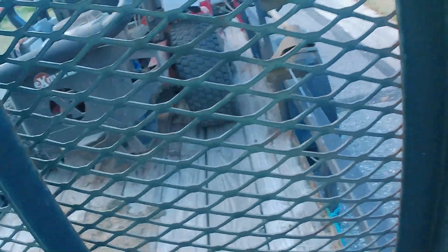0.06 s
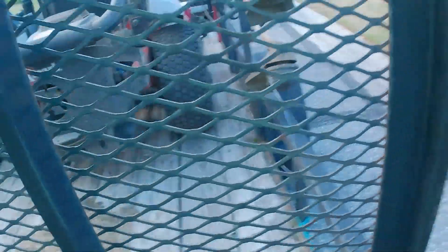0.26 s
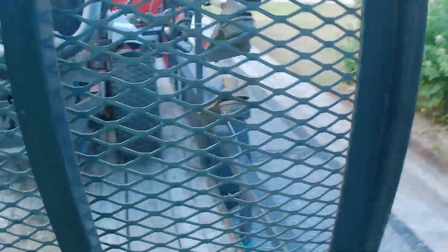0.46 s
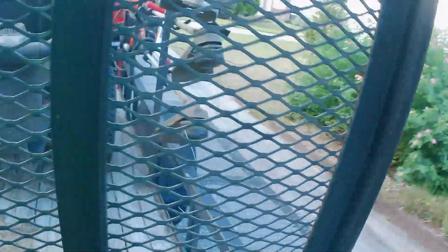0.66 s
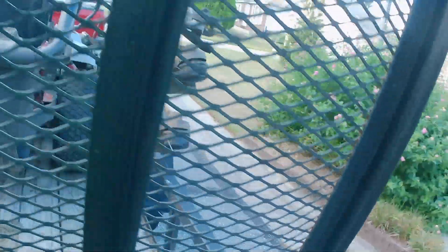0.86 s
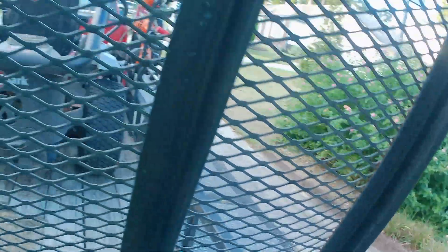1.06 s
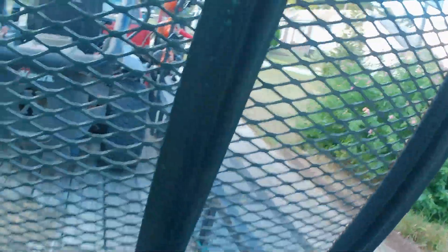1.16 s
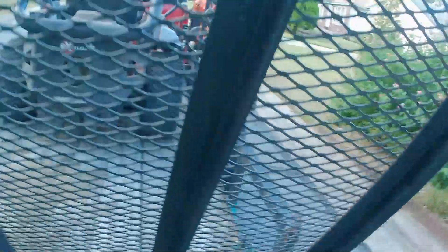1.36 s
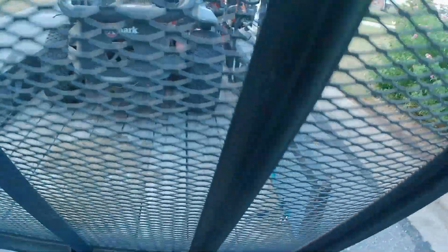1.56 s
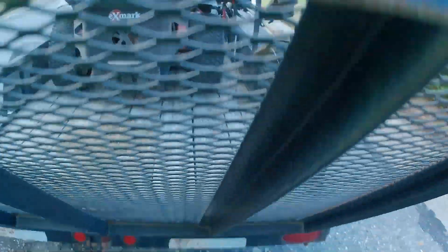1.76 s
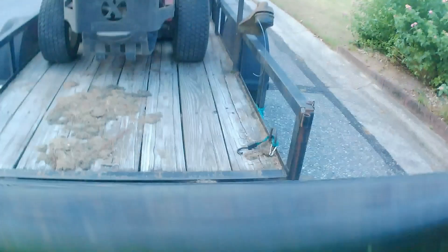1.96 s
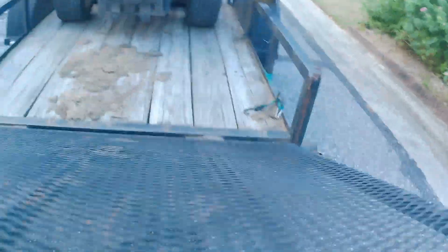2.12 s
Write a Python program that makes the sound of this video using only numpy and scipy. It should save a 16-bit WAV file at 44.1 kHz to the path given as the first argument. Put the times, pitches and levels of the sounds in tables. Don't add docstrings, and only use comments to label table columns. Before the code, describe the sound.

Metal trailer gate unlatching: small squeaks, one loud clang, weaker irregular clanks with sizzling mesh rattle

```python
import sys
import numpy as np
from scipy import signal
from scipy.fft import rfft, irfft
from scipy.io import wavfile
from scipy.ndimage import uniform_filter1d

SR = 44100
rng = np.random.default_rng(int(sys.argv[2]) if len(sys.argv) > 2 else 0)


def wav_out(sig):
    wavfile.write(sys.argv[1], SR, np.round(np.clip(np.atleast_2d(sig).T, -1, 1) * 32767).astype(np.int16))


def makeup_ratio(level_db):
    decades = np.asarray(level_db, float) / 20
    return 10 ** decades


N = 97020


def rms_one(x):
    return x / np.sqrt(np.mean(x ** 2) + 1e-20)


def at_hz(points, hz):
    table_hz, value = np.transpose(points)
    return np.interp(np.log(hz), np.log(table_hz), value)


def drift(rate_hz):
    r = np.exp(-2 * np.pi * rate_hz / SR)
    noise = rng.standard_normal(N + SR)
    return rms_one(signal.lfilter([1], [1, -2 * r, r * r], noise)[SR:])


def ring(clicks, hz, t60):
    r, w = makeup_ratio(-60 / (t60 * SR)), 2 * np.pi * hz / SR
    return signal.lfilter([0, np.sin(w)], [1, -2 * r * np.cos(w), r * r], clicks + 1e-18)


def colour(x, spectrum):
    hz = np.arange(N // 2 + 1) * SR / N + 1
    return rms_one(irfft(rfft(x) * makeup_ratio(at_hz(spectrum, hz)), N))


def band(x, low_hz, high_hz, order=2):
    return signal.sosfilt(signal.butter(order, [low_hz, high_hz], "band", fs=SR, output="sos"), x)


BASS_HZ, MID_HZ, TREBLE_HZ = 267, 910, 3890


def strike_db(strikes, hz):
    s, db, bass_db, treble_db = np.transpose(strikes)
    toward = np.log(hz / MID_HZ) / np.log([BASS_HZ / MID_HZ, TREBLE_HZ / MID_HZ])
    low, high = np.clip(toward, 0, 1.5)
    return db + low * bass_db + high * treble_db


# (time [s], peak level [dB], extra bass [dB], extra treble [dB])
BLOWS = [(0.256, 0, -2, -14), (0.347, -9.5, -1, 2.5), (0.514, -12.5, 1.2, 4), (0.598, -22, 6.5, 8.5),
         (0.771, -7.5, -2, 7), (.782, -16, 2.5, -24), (0.951, -12.5, -5, 3.5), (1.08, -19.5, -19, -8.5),
         (1.332, -15, -0.5, -25), (1.37, -25.5, 7.5, -1.5), (1.447, -21, 1.7, -7.5), (1.525, -28, 6, -11),
         (1.568, -25.5, 2.1, -10), (1.617, -29, 4, -5.5), (1.752, -21, 4, -6), (1.764, -22, -7.5, 4),
         (1.907, -48, 7, 10), (1.978, -29, 2.5, -25)]
# (time [s], level [dB], extra bass [dB], extra treble [dB])
SHOVES = [(0.049, -38, -11, -10), (0.084, -28.5, -8, 0), (0.109, -26.5, 1, -7), (.16, -20, 0.5, -11),
          (.19, -14.5, 8, 0), (0.219, -18, -18, -2), (.372, -9.5, -4.5, -17), (.42, -18, 5, -4),
          (0.599, -23.5, -6, 7), (0.711, -27, 10.5, -7), (1.04, -36, 19.5, 9), (1.105, -29.5, 1, -4.5),
          (1.179, -32.5, 7, -28), (1.265, -36.5, 7, -12), (1.403, -45.5, 4.5, 8.5), (1.79, -29.5, -7, -2),
          (1.99, -39, 7.5, -10), (2.02, -50.5, -0.5, -14)]
# (frequency [Hz], density [dB per Hz])
FRAME = [(120, -16), (300, -7), (600, -4), (790, -8.5), (1220, -3), (1650, -7), (2300, -8.5), (6000, -29)]
# (frequency [Hz], t60 [s])
FRAME_T60 = [(150, 0.69), (400, 0.28), (1040, 0.16), (2760, 0.12), (6000, 0.052)]
# (frequency [Hz], level [dB], t60 [s])
TUBES = [(642, -18.5, 0.055), (1144, -26.5, 0.19), (2930, -23.5, 0.07), (1970, -29.5, 0.32),
         (454, -24.5, 0.31)]
CONTACT_S, SHOVE_S = .005, .03
FRAME_DB, MODE_SPREAD_DB, T60_SPREAD_DB = -27, 4, 2
FRAME_CUT_HZ = 147


def frame(count=420):
    strikes = BLOWS + SHOVES
    s = np.array(strikes)[:, 0]
    contact_s = np.repeat([CONTACT_S, SHOVE_S], [len(BLOWS), len(SHOVES)])
    hz = np.geomspace(130, 6500, count) * np.exp(rng.normal(0, .004, count))
    t60 = at_hz(FRAME_T60, hz) * makeup_ratio(T60_SPREAD_DB * rng.uniform(-0.067, 1, count))
    uneven_db = MODE_SPREAD_DB * np.minimum(rng.standard_normal(count), 2)
    mode_db = FRAME_DB + uneven_db + at_hz(FRAME, hz) + 10 * np.log10(hz / 1000)
    modes = list(zip(hz, mode_db, t60)) + TUBES
    strength = rng.standard_normal((len(s), len(modes)))
    late = rng.random((len(s), len(modes)))
    out, clicks = np.zeros(N), np.zeros(N)
    for k, (f, level_db, ring_s) in enumerate(modes):
        at = ((s + contact_s * late[:, k] ** 1.5) * SR).astype(int)
        push = (.5 + .5 * np.abs(strength[:, k])) * np.sign(strength[:, k])
        clicks[at] = push * makeup_ratio(level_db + strike_db(strikes, f))
        out += ring(clicks, f, ring_s)
        clicks[at] = 0
    return band(out, FRAME_CUT_HZ, 11000)


def latch_knock():
    click = np.zeros(N)
    click[int(.2599 * SR)] = makeup_ratio(-2)
    return band(ring(click, 850, .006), FRAME_CUT_HZ, 11000)


# (frequency [Hz], t60 [s])
TAIL_T60 = [(150, 0.21), (400, 1), (1040, 0.7), (2760, 0.62), (6000, 0.23)]
TAIL_DB = -11.5


def frame_tail():
    strikes = BLOWS + SHOVES
    at = (np.array(strikes)[:, 0] * SR).astype(int)
    edges = 130 * 2 ** np.arange(0, 6.1, .5)
    out = np.zeros(N)
    white = rng.standard_normal((2, N))
    for k, (low, high) in enumerate(zip(edges, edges[1:])):
        hz, power = np.sqrt(low * high), np.zeros(N)
        power[at] = makeup_ratio(2 * strike_db(strikes, hz))
        power = signal.lfilter([1], [1, -makeup_ratio(-120 / (at_hz(TAIL_T60, hz) * SR))], power)
        power = uniform_filter1d(power, size=221, origin=110)
        out += np.sqrt(np.abs(power)) * makeup_ratio(at_hz(FRAME, hz)) * band(white[k % 2], low, high)
    return makeup_ratio(TAIL_DB) * out


# (time [s], frequency [Hz], level [dB], t60 [s])
CLANGS = [(.257, 2092, -21, 0.34), (.258, 4110, -19.5, 0.079), (.257, 548.6, -13.5, 0.078),
          (.257, 985, -17.5, 0.18), (0.261, 192.8, -27, 0.2), (0.261, 322, -21, .12),
          (.258, 650, -29, 0.51), (0.257, 1238, -14.5, 0.088), (0.257, 1064, -18, 0.19),
          (.258, 4320, -29, 0.15), (.258, 3430, -27, .11), (0.349, 582, -24, 0.22),
          (0.348, 1172, -25.5, 0.22), (.349, 2330, -29, 0.19), (0.362, 2950, -33, 0.16),
          (0.351, 4450, -27.5, 0.063), (0.346, 3690, -26.5, 0.046), (.415, 463, -31, 0.29),
          (0.43, 201, -28, 0.19), (0.512, 1712, -26, 0.087), (.6, 1887, -30, 0.15),
          (0.773, 1146, -24, 0.27), (.772, 605, -19, 0.041), (0.772, 1460, -19, 0.053),
          (.78, 329, -35, 0.28), (.79, 2062, -53, .5), (0.953, 1322, -22.5, 0.059),
          (0.953, 1043, -29.5, 0.2), (0.955, 1472, -33.5, 0.091), (.96, 2100, -36, 0.3),
          (.953, 2934, -30, 0.063), (1.05, 207.5, -36, 0.27), (1.251, 3000, -51, .03),
          (1.267, 3560, -51, .03), (.2, 290, -27, 0.24), (1.334, 1038, -38.5, 0.24),
          (1.336, 1270, -35.5, 0.13), (1.333, 3140, -47, 0.053), (1.374, 3170, -48, 0.035),
          (1.424, 2470, -59.5, .03), (1.448, 3200, -44.5, 0.045), (1.448, 1267, -35.5, 0.051),
          (1.766, 2077, -38, 0.21), (1.768, 1380, -38, 0.15), (1.768, 1760, -42.5, 0.15),
          (1.764, 4130, -46.5, 0.15), (1.907, 3840, -59, 0.046), (1.9795, 636, -39, 0.097),
          (1.98, 2770, -57, .07), (1.981, 3520, -61, .06)]
TWIN_RATIO, TWIN_SHARE = 1.012, .4


def clangs():
    out = np.zeros(N + SR)
    click = np.zeros(SR // 2)
    for s, hz, db, t60 in CLANGS:
        click[0] = makeup_ratio(db)
        start = int(s * SR)
        pair = ring(click, hz, t60) + TWIN_SHARE * ring(click, hz * TWIN_RATIO, t60)
        out[start:start + SR // 2] += pair
    return band(out[:N], FRAME_CUT_HZ, 15400)


# (time [s], level [dB], rise [s], t60 [s])
JOLTS = [(0.075, -48, 0.0033, .15), (0.088, -39, 0.0069, .2), (.1, -30, 0.0089, 0.24),
         (0.158, -22, 0.0034, 0.25), (0.194, -19, 0.015, 0.15), (0.2547, -11, 0.004, 0.24),
         (0.344, -21, 0.0074, 0.54), (0.368, -15, 0.022, 0.12), (.513, -31.5, 0.011, 0.22),
         (0.593, -25.5, 0.0059, 0.16), (0.698, -29.5, 0.0076, 0.094), (0.7713, -19, 0.0029, 0.2),
         (.925, -33.5, 0.023, 0.13), (.95, -32, 0.0028, 0.35), (1.045, -42, 0.0049, 0.17),
         (1.065, -42, 0.0084, 0.18), (1.167, -36.5, 0.0044, 0.072), (1.238, -40.5, 0.0037, 0.095),
         (1.25, -50, 0.0036, .06), (1.266, -51, 0.0036, 0.1), (1.333, -39, 0.0035, 0.12),
         (1.372, -53, 0.0053, 0.11), (1.447, -47, 0.0043, 0.16), (1.519, -54, 0.0046, 0.092),
         (1.619, -57, 0.0043, 0.063), (1.753, -51, 0.0056, .13), (1.764, -36.5, 0.01, 0.11),
         (1.907, -59.5, 0.0046, 0.078), (1.979, -71, .004, .08)]
# (frequency [Hz], density [dB per Hz])
MESH = [(1060, -19.5), (1800, -6), (3740, -3.5), (4060, -3.5), (4660, -4.5), (5640, -6.5), (7910, -2.5),
        (10900, -4.5), (16000, -25.5)]
TICKS_PER_S, TICK_SPREAD_DB, TICK_CYCLES = 16000, -2, 11.5
MESH_DB, MESH_TAIL_DB, MESH_TAIL_T60_S = -11, -19.5, 0.37
PATCH_DB, PATCH_PER_S = 1.5, 10.4
DULLING_DB_PER_S = 3
PIN_RING_DB, PIN_RING_T60_S = -38.5, 0.042


def mesh(count=24):
    t, shake = np.arange(N) / SR, np.zeros(N)
    for s, db, rise_s, t60 in JOLTS:
        age = np.maximum(t - s, 0)
        swell = makeup_ratio(db) * np.minimum(age / max(rise_s, 1e-4), 1)
        after = 120 * np.maximum(age - rise_s, 0)
        decay = makeup_ratio(-after / t60) + makeup_ratio(2 * MESH_TAIL_DB - after / MESH_TAIL_T60_S)
        shake += swell ** 2 * decay
    tick_here = rng.random(N) < TICKS_PER_S / SR
    ticks = tick_here * makeup_ratio(TICK_SPREAD_DB * rng.exponential(1, N)) * rng.choice([-1, 1], N)
    dealt = rng.integers(0, count, N)
    rings = np.zeros(N)
    for k, hz in enumerate(np.geomspace(1800, 16000, count)):
        strand = ring(ticks * (dealt == k), hz, TICK_CYCLES / hz) * np.sqrt(hz)
        dulling_db = DULLING_DB_PER_S * t * max(np.log2(hz / 5000), 0)
        rings += strand * makeup_ratio(PATCH_DB * drift(PATCH_PER_S) - dulling_db)
    rattle = makeup_ratio(MESH_DB) * np.sqrt(shake) * colour(rings, MESH)
    pin_ring = sum(ring(rattle, hz, PIN_RING_T60_S) for hz in PIN_HZ[:6])
    return rattle + makeup_ratio(PIN_RING_DB) * pin_ring


# (start [s], length [s], level [dB], mode [index into PIN_HZ])
SQUEAKS = [(.042, 0.037, -57, 1), (.043, 0.028, -68, 0), (0.085, .04, -49, 1), (.045, 0.043, -78, 3),
           (0.09, 0.075, -42, 3), (0.1, 0.08, -44, 0), (0.134, 0.03, -44, 2), (.138, 0.022, -55, 4),
           (.11, .045, -61.5, 5), (0.26, 0.043, -34, 0), (0.3, 0.055, -45, 2), (0.309, 0.044, -44, 3),
           (0.423, 0.041, -48, 3), (0.516, 0.07, -54.5, 3), (0.63, 0.062, -53.5, 3), (0.736, 0.025, -55, 3),
           (1.166, 0.039, -64, 3), (1.194, 0.035, -78, 4), (0.638, 0.033, -60, 2), (0.267, .025, -38, 1),
           (2.008, 0.072, -66.5, 6)]
PIN_HZ = [5430, 6140, 7840, 9670, 12000, 14620, 5680]
SQUEAK_EDGE_S, SQUEAK_WIDTH_HZ, SQUEAK_CLEAN = .014, 110, .5
SQUEAK_WANDER_HZ, SQUEAK_FLUTTER_DB = 55, 1.8


def pin():
    t, out, sing = np.arange(N) / SR, np.zeros(N), []
    for hz in PIN_HZ:
        wander = SQUEAK_WANDER_HZ * (hz / 10000) ** 2 * drift(25)
        flutter = makeup_ratio(SQUEAK_FLUTTER_DB * hz / 10000 * drift(40))
        line = np.sin(2 * np.pi * np.cumsum(hz + wander) / SR) * flutter
        ragged = rms_one(ring(rng.standard_normal(N), hz, 4.2 / SQUEAK_WIDTH_HZ))
        sing.append(SQUEAK_CLEAN * line + (1 - SQUEAK_CLEAN) * hz / 10000 * ragged)
    for s, length, db, mode in SQUEAKS:
        gate = np.clip(np.minimum(3 * (t - s), s + length - t) / SQUEAK_EDGE_S, 0, 1)
        out += gate * makeup_ratio(db) * sing[int(round(mode))]
    return out


# (time [s], peak level [dB])
SNAPS = [
    (1.601, -33.5),
    (2.1, -59),
    (1.1395, -62),
]
SNAP_LOW_HZ, SNAP_HIGH_HZ, SNAP_T60_S = 1700, 11000, .007


def snaps():
    t, noise, shape = np.arange(N) / SR, rng.standard_normal(N), np.zeros(N)
    for s, db in SNAPS:
        shape += (t >= s) * makeup_ratio(db - 60 * np.maximum(t - s, 0) / SNAP_T60_S)
        noise[int(np.ceil(s * SR))] = -6
    return band(noise * shape, SNAP_LOW_HZ, SNAP_HIGH_HZ, order=3)


FLEX_S, FLEX_LENGTH_S, FLEX_DB, FLEX_FROM_HZ, FLEX_TO_HZ = 1.2, .08, -38, 30, 62


def flex():
    part = np.clip((np.arange(N) / SR - FLEX_S) / FLEX_LENGTH_S, 0, 1)
    hz = FLEX_FROM_HZ + (FLEX_TO_HZ - FLEX_FROM_HZ) * part
    swell = np.sqrt(np.abs(np.sin(np.pi * part)))
    return makeup_ratio(FLEX_DB) * swell * np.sin(2 * np.pi * np.cumsum(hz) / SR)


# (frequency [Hz], density [dB per Hz])
AIR = [(59, -30), (100, -1.5), (174, -9), (266, -14), (1650, -26), (2000, -28), (4670, -39.5), (12900, -45),
       (16000, -48)]
# (time [s], level [dB])
WIND = [(0, -53.5), (1.7, -56.5), (1.9, -53), (2.2, -56.5)]
# (frequency [Hz], level [dB])
HUM = [(57, -61), (113, -57)]
AIR_DB, WIND_LOW_HZ, WIND_HIGH_HZ, WIND_LUMP_DB = -58.5, 25.4, 76.4, -3


def outdoors():
    t = np.arange(N) / SR
    hiss = colour(rng.standard_normal(N), [(40, -32.5)] + AIR)
    air = makeup_ratio(AIR_DB + 1.5 * drift(21)) * hiss
    wind = rms_one(band(rng.standard_normal(N + SR), WIND_LOW_HZ, WIND_HIGH_HZ)[SR:])
    gust = makeup_ratio(np.interp(t, *np.transpose(WIND)) + WIND_LUMP_DB * drift(4.0))
    hum = np.zeros(N)
    for hz, db in HUM:
        hum += makeup_ratio(db + 2.0 + 2.7 * drift(8.2)) * np.sin(2 * np.pi * hz * t)
    return air + wind * gust + hum


HOLLOW_HZ, HOLLOW_WIDTH_HZ, HOLLOW_SHARE = 1612, 284, 0.33


def scene():
    body = frame() + latch_knock() + frame_tail()
    low_hz, high_hz = HOLLOW_HZ - HOLLOW_WIDTH_HZ / 2, HOLLOW_HZ + HOLLOW_WIDTH_HZ / 2
    body = body - HOLLOW_SHARE * band(body, low_hz, high_hz, order=1)
    return (body + clangs() + mesh() + pin() + snaps() + flex() + outdoors())[None]


def roll_off(x):
    return signal.sosfilt(signal.butter(12, 16310, fs=SR, output="sos"), x)


def record(dry):
    dull = signal.sosfilt(signal.butter(4, 14570, fs=SR, output="sos"), dry)
    dull = signal.sosfilt(signal.cheby2(10, 50, 16800, fs=SR, output="sos"), dull)
    return roll_off(np.clip(dull, -1, 1))


dry = scene()
out = record(dry)
wav_out(out)
```